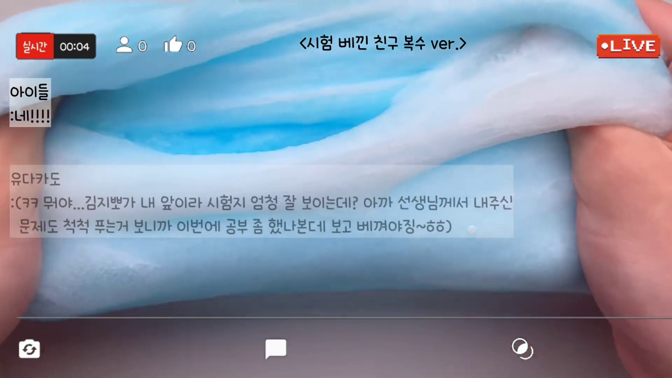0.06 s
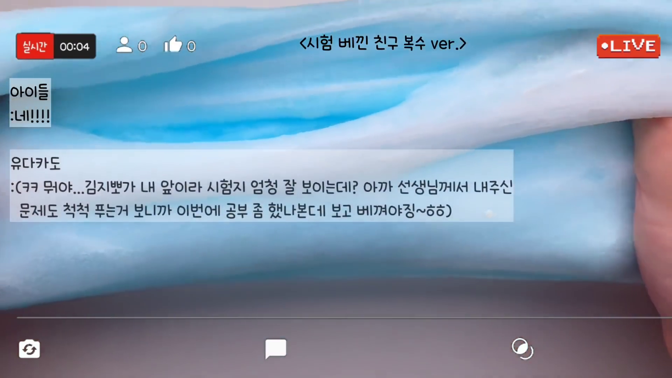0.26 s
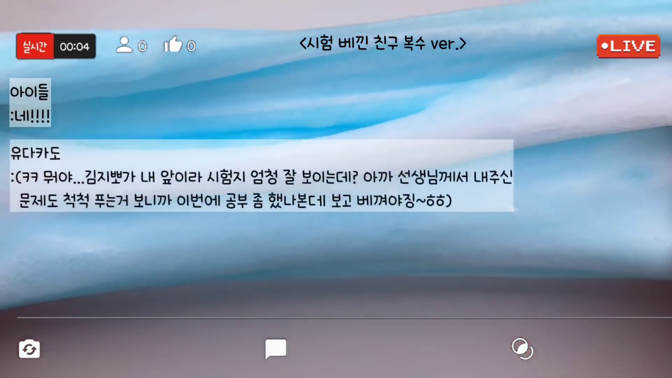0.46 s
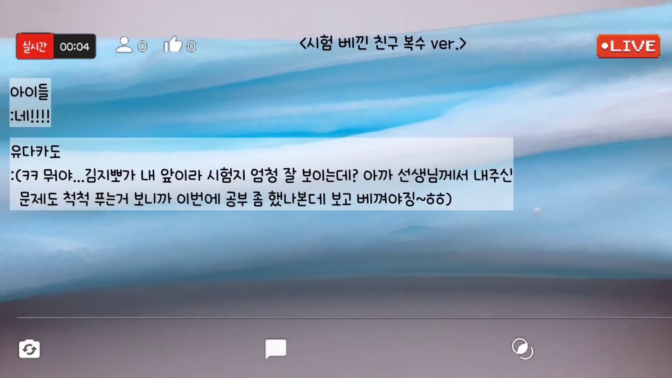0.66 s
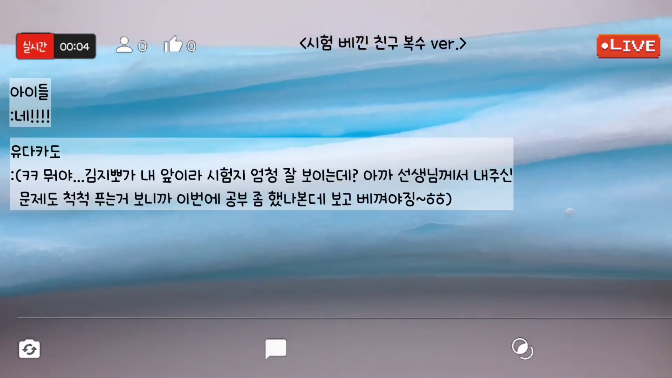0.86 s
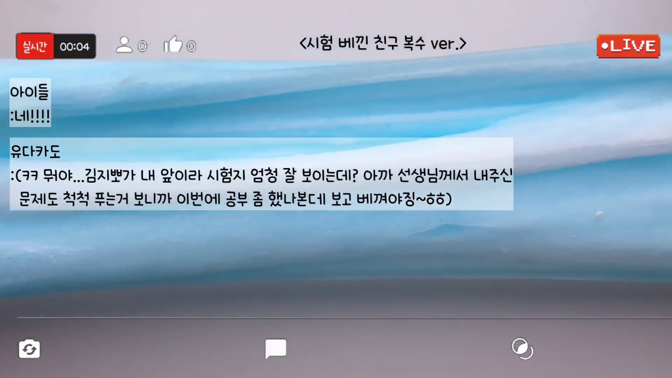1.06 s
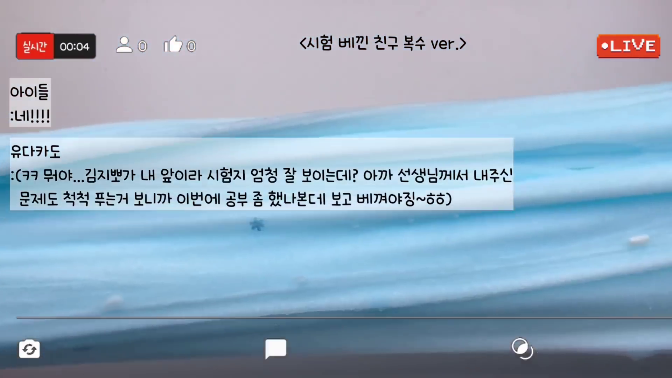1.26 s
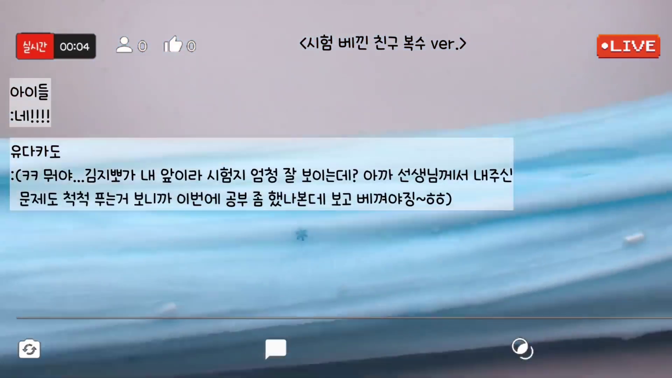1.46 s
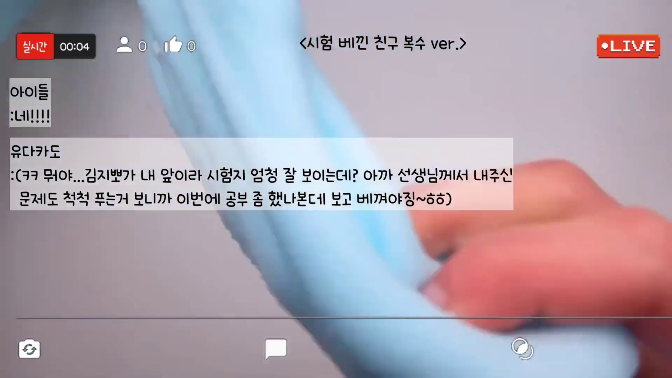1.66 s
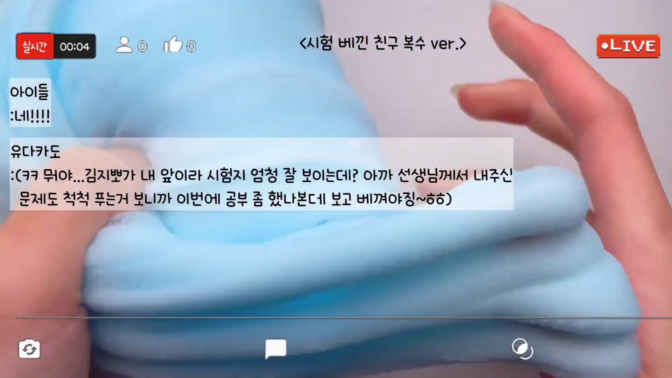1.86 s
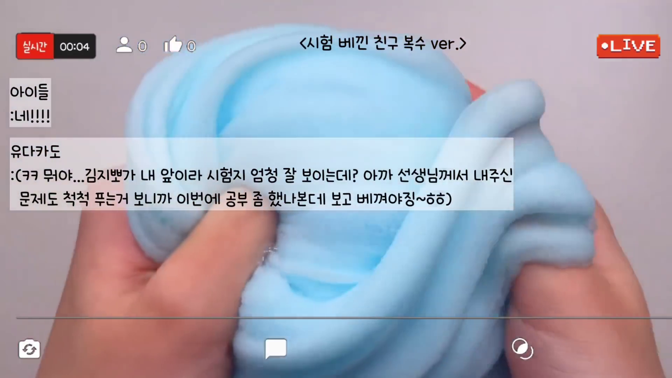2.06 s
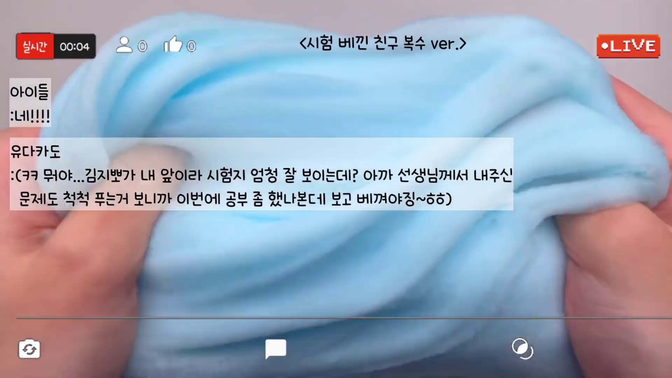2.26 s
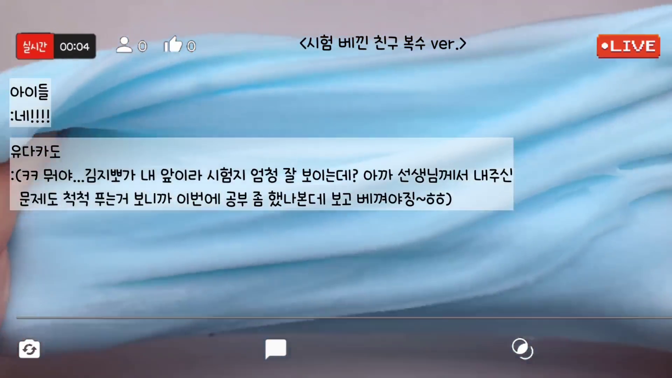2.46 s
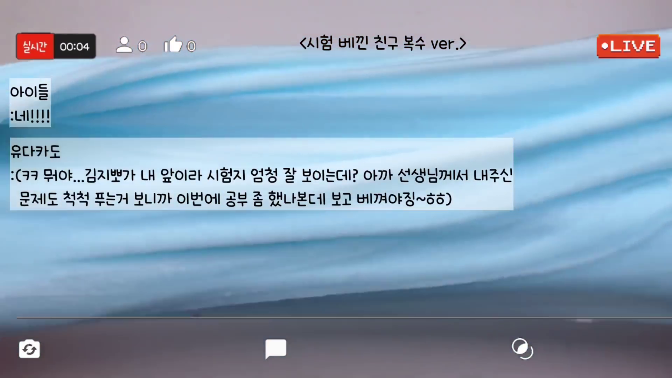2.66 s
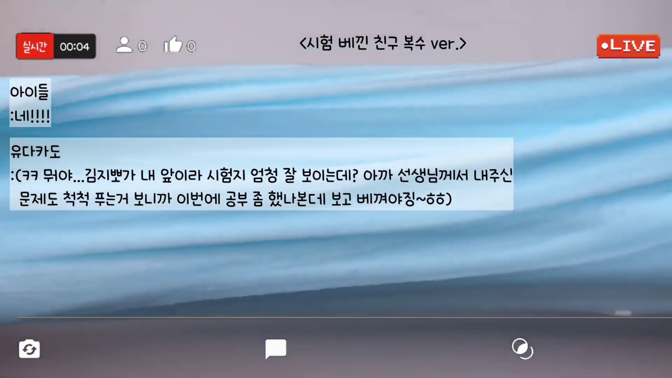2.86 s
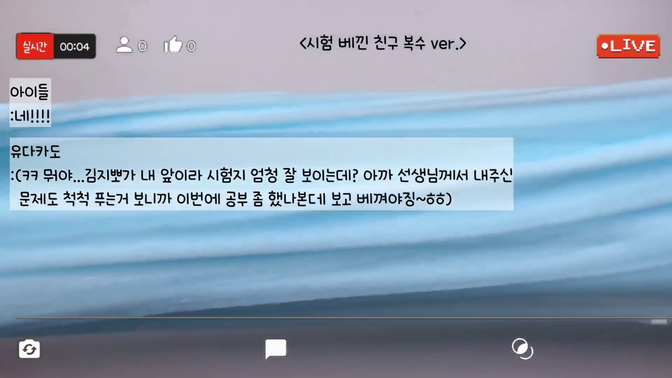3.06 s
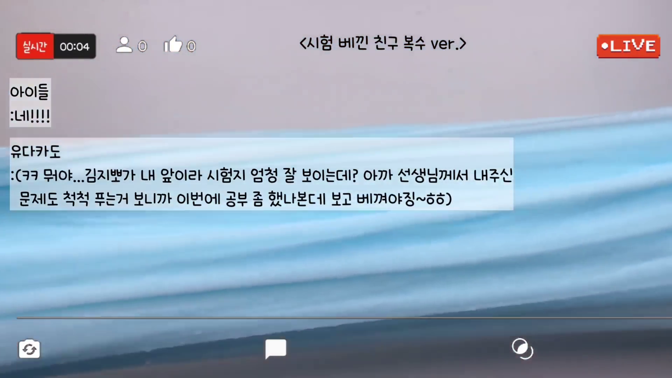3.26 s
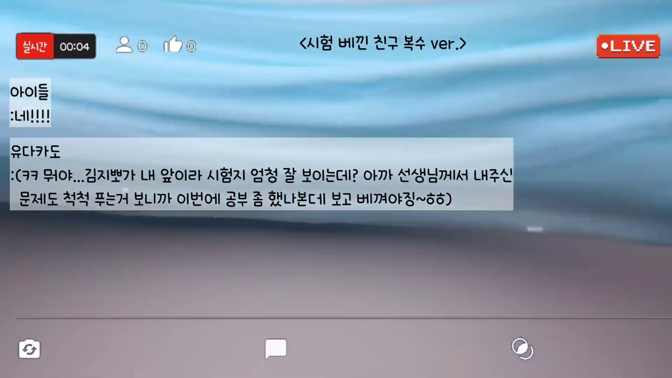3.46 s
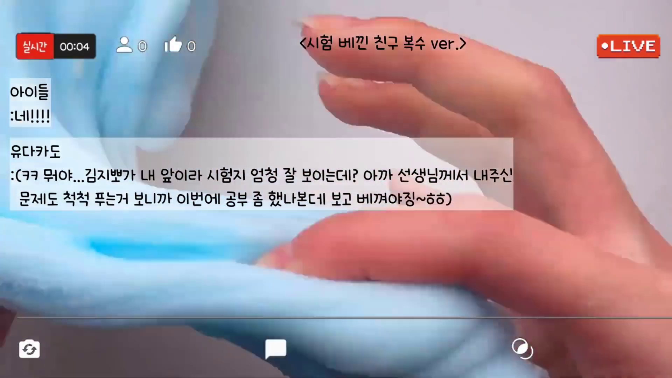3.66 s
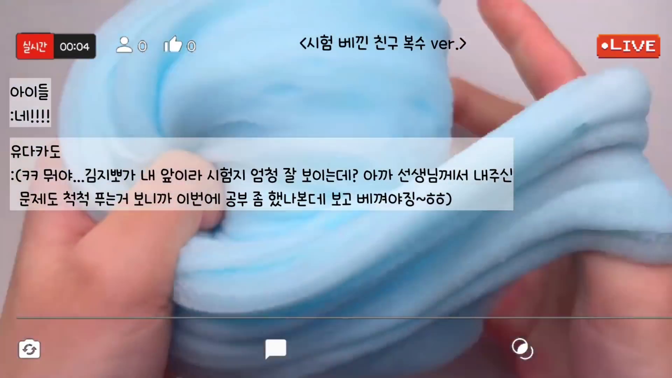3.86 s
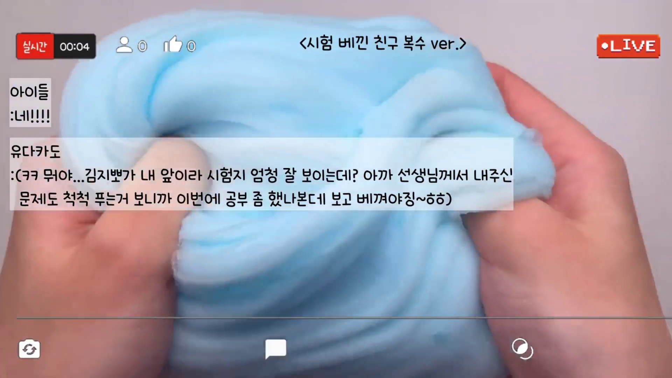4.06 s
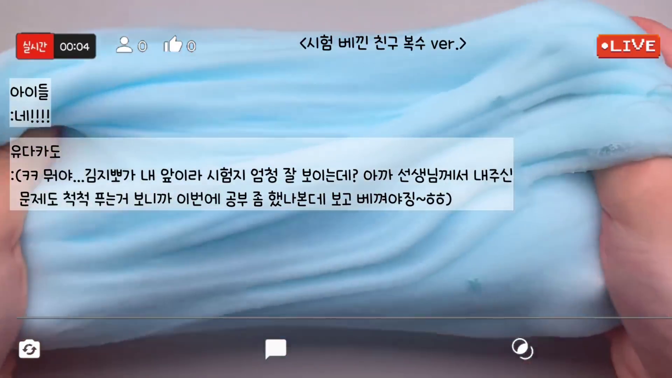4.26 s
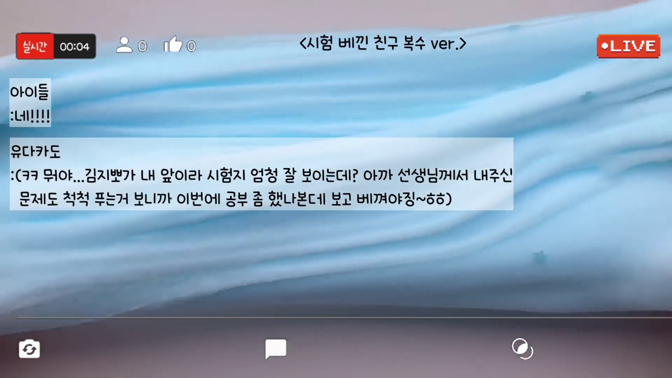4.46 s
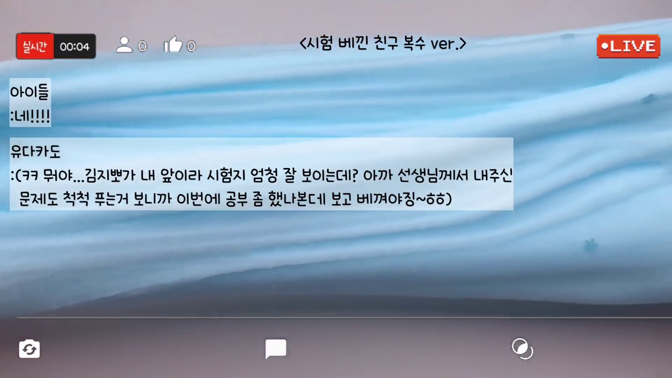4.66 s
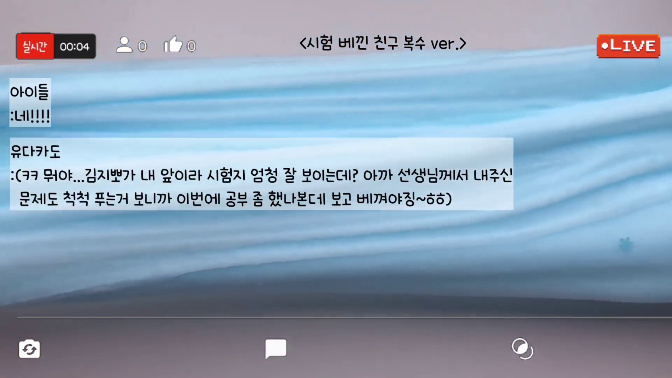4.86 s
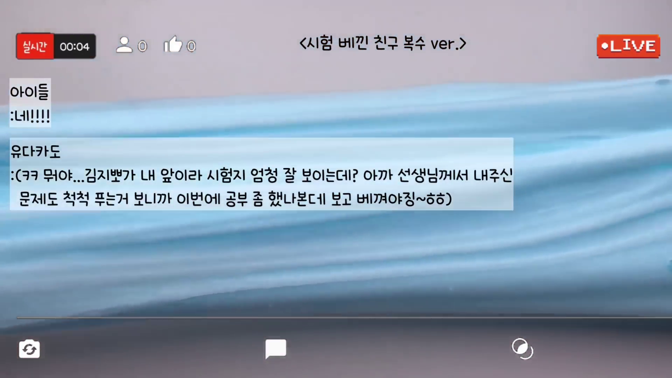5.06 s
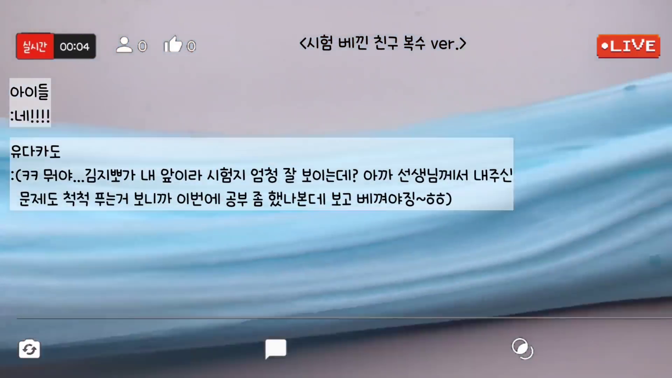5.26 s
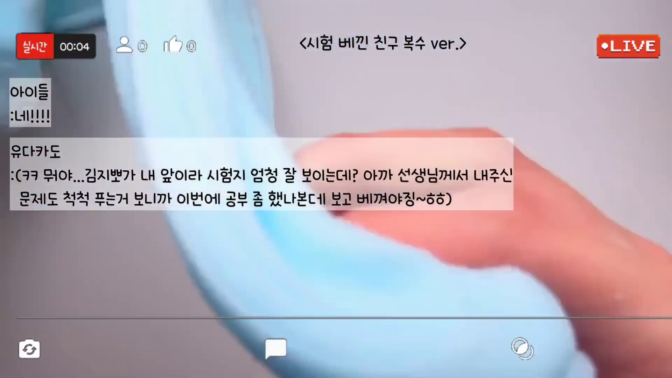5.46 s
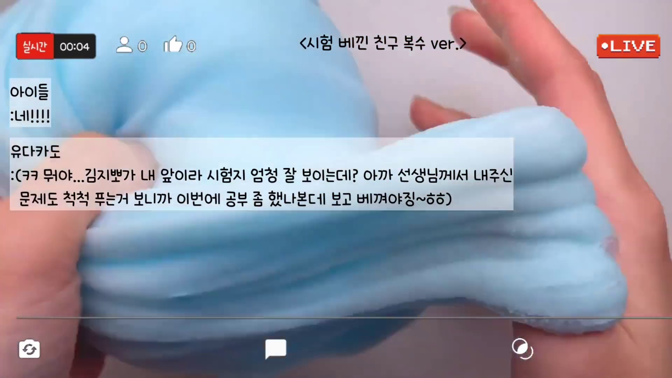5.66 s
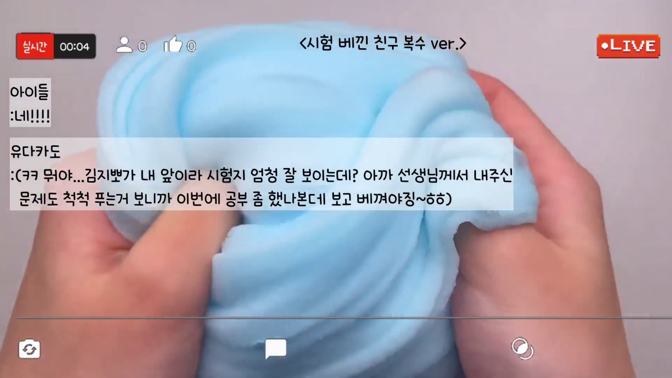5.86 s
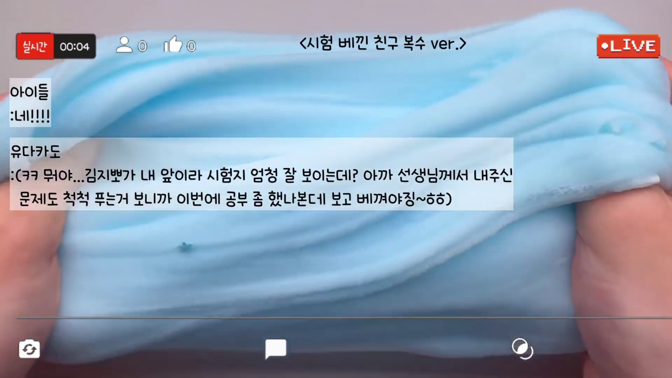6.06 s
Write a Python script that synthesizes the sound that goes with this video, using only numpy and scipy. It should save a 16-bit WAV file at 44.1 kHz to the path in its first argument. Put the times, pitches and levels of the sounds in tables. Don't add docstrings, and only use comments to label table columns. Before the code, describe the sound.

Close stereo sound of sticky slime being pulled and folded in a small quiet room. Faint fizz and tiny ticks come first, then short squelches and crackling clusters of pops around two seconds. Quieter stretching follows, before more kneading, snapping clicks and hollow pops near four seconds and again at the end. A low motor hum enters after about one second, mainly left.

```python
import sys
import numpy as np
from scipy import signal
from scipy.fft import rfft, irfft
from scipy.io import wavfile
from scipy.ndimage import uniform_filter1d

SR = 44100
rng = np.random.default_rng(int(sys.argv[2]) if len(sys.argv) > 2 else 0)


def invert_db(x):
    u = np.asarray(x, float) / 20
    return 10 ** u


def file_out(sig):
    cols = np.atleast_2d(sig).T
    lim = np.clip(cols, -1, 1)
    pcm = np.round(lim * 32767).astype(np.int16)
    wavfile.write(sys.argv[1], SR, pcm)


N = 269451


def evened(x):
    return x / np.sqrt(np.mean(x ** 2) + 1e-20)


def peaked(x):
    return x / abs(x).max()


def read(points, hz):
    f, value = np.transpose(points)
    return np.interp(np.log(hz + 1), np.log(f + 1), value)


def add(mix, start_s, sound):
    part = mix[:, round(start_s * SR):][:, :sound.shape[1]]
    part += sound[:, :part.shape[1]]


def ring(x, hz, width_hz):
    quality = max(hz / width_hz, .3)
    return signal.lfilter(*signal.iirpeak(min(hz, 18000), quality, SR), x)


def band(x, lo_hz, hi_hz):
    return signal.lfilter(*signal.butter(2, [lo_hz, min(hi_hz, 20000)], "band", fs=SR), x)


def wander(per_s):
    knots = rng.standard_normal(int(per_s * N / SR) + 2)
    joined = np.interp(np.arange(N) * per_s / SR, np.arange(len(knots)), knots)
    return joined * np.sqrt(1.5)


def grains(spectrum, per_s, spread_db, patchy_db):
    # pitch_hz, likeness (0 to 1)
    coherence = [(60, 0.84), (180, 0.63), (550, 0.03), (1650, 0.12), (4970, 0.027), (15000, 0.49)]
    happens = rng.random((2, N)) < per_s / SR
    size = invert_db(spread_db * np.minimum(rng.exponential(1, (2, N)), 5)) * happens
    hz, t, (a, b) = signal.stft(size * rng.standard_normal((2, N)), SR, nperseg=1024, noverlap=768)

    patches = rng.standard_normal(a.shape[::-1]).T
    patches = evened(uniform_filter1d(uniform_filter1d(patches, 14, 0), 6, 1))
    same = np.clip(read(coherence, hz), -1, 1)[:, None]
    ports = np.array([a, same * a + np.sqrt(1 - same ** 2) * b])
    ports *= invert_db(read(spectrum, hz)[:, None] + patchy_db * patches)
    both = signal.istft(ports, SR, nperseg=1024, noverlap=768)[1][:, :N]
    return both / np.sqrt(np.mean(both.mean(0) ** 2))


def gripping():
    # start_s, hold_s, peeling_db, kneading_db
    grips = [(0.001, 0.061, -56, -56.5), (1.088, 0.037, -54, -68), (1.24, 0.071, -60, -62.5),
             (1.52, 0.13, -45, -53), (1.7, 0.14, -50, -52.5), (1.805, 0.043, -73, -68),
             (2.18, 0.1, -53, -51.5), (2.54, .06, -73, -63.5), (3.437, .12, -43.5, -51.5),
             (3.601, 0.081, -47, -48.5), (3.752, 0.0088, -45.5, -45), (4.075, 0.12, -51, -51),
             (4.279, 0.061, -53.5, -55.5), (4.44, 0.052, -56, -69), (5.11, 0.022, -79, -59),
             (5.279, .13, -41.5, -49), (5.461, 0.083, -47, -44), (5.592, 0.018, -53, -47),
             (5.914, 0.16, -44, -47.5)]
    # time_s, peeling_db
    stretch = [
        (0, -62),
        (0.7, -58),
        (1.2, -65.5),
        (2.0, -62.5),
        (2.8, -62.5),
        (3.2, -64),
        (4.8, -62),
        (6.11, -58),
    ]
    rise_db_per_s, sag_db_per_s, let_go_db_per_s = 336, 36, 239
    creep_db, creep_db_per_s = -11, 23
    lean_db, lean_db_per_s = -7.5, 47
    rest_squelch_db, rest_push_db = -70.5, -66

    t = np.arange(0, N / SR, .002)
    start, hold, peel_db, knead_db = np.transpose(grips)[:, :, None]
    early = np.maximum(start - t, 0)
    held = np.clip(t - start, 0, hold)
    late = np.maximum(t - start - hold, 0)
    release_db = np.maximum(-let_go_db_per_s * late, creep_db - creep_db_per_s * late)
    grip_db = release_db - rise_db_per_s * early

    squelch_db = knead_db + grip_db
    fizz_db = peel_db + grip_db - sag_db_per_s * held
    push_db = knead_db + grip_db + lean_db - lean_db_per_s * (hold - held)
    layers = [(squelch_db, rest_squelch_db),
              (fizz_db, np.interp(t, *np.transpose(stretch))),
              (push_db, rest_push_db)]
    gains = []
    for each_db, rest_db in layers:
        energy = (invert_db(each_db) ** 2).sum(0) + invert_db(rest_db) ** 2
        gains.append(np.interp(np.arange(N) / SR, t, np.sqrt(energy)))
    return gains


def bubbles(per_s):
    bubble_hz = [688, 902, 1042, 1550, 2900]
    happens = rng.random((5, N)) < per_s / SR
    size = invert_db(4.0 * np.minimum(rng.exponential(1, (5, N)), 4)) * happens
    blips = 0
    for train, hz in zip(size, bubble_hz):
        width_hz = 0.26 * hz
        blips = blips + ring(ring(train, hz, width_hz), hz, width_hz) / np.sqrt(hz)
    return evened(blips) * np.ones((2, 1))


def hands():
    # pitch_hz, density_db (per Hz)
    squelch_colour = [(180, -3), (300, -27), (437, -8), (676, -3.5), (951, -0.5), (1200, -5), (1500, 2),
                      (1670, -3.5), (2620, -8.5), (5000, -10.5), (6500, -16), (11000, -120)]
    # pitch_hz, density_db (per Hz)
    fizz_colour = [(1470, -12), (2500, -1.5), (4300, -2.5), (5200, -3), (7070, -2.5), (8010, -3.5),
                   (10500, -0.5), (14800, -2), (15900, -13), (16400, -88)]
    # pitch_hz, density_db (per Hz)
    push_colour = [(18, -27), (30, -3.5), (58, 7.5), (97, -2), (146, -18), (182, -2), (253, -11),
                   (455, -20.5), (600, -20.5), (780, -45), (1320, -120)]
    # pitch_hz, density_db (per Hz)
    air_colour = [(180, -31), (300, 5), (530, 2.5), (1050, -21), (1830, 16), (2830, -35), (7980, 0),
                  (11200, 9), (14600, 6.5), (15600, 7.5), (16400, -64)]

    kneading, peeling, leaning = gripping()
    clumps_db = 2.0 * np.tanh(wander(per_s=42))
    kneading = kneading * invert_db(clumps_db)
    peeling = peeling * invert_db(0.71 * clumps_db)

    squelch = grains(squelch_colour, 7000, spread_db=2.6, patchy_db=3.6)
    fizz = grains(fizz_colour, 10000, spread_db=2.6, patchy_db=1.9)
    push = grains(push_colour, 8000, spread_db=1.5, patchy_db=2.0)
    air = invert_db(-66) * grains(air_colour, 40000, spread_db=-1.0, patchy_db=3.0)

    left = invert_db([[1.3], [-1.3]])
    moving = left * (kneading * invert_db(-2.44) * squelch + leaning * invert_db(6.5) * push) + peeling * fizz
    return moving + air + left * kneading * invert_db(-4.5) * bubbles(per_s=70)


def pockets():
    # start_s, hollow_db, pocket_db, pitch_hz, pan_db (left over right)
    bursts = [(0.992, -44.5, -34, 3400, 6), (1.066, -41, -11, 3930, 1.5), (1.271, -57, -12.5, 2830, -5.5),
              (1.7955, -14.5, -24.5, 1550, 6), (1.816, -38, -40, 2370, -4), (2.1715, -7, -9.5, 2800, 7),
              (2.177, -35, -38, 2280, 6), (2.239, -32, -15, 2540, 1.4), (3.741, -51, -35, 2200, 4),
              (4.082, -13, -16, 3160, 6), (4.0814, -18, -19.5, 4870, -1.5), (4.185, -35, -35, 3340, 2.2),
              (4.196, -50, -27, 2250, 2.5), (4.202, -39, -10, 6500, 1.2), (4.723, -30, -30, 1700, 1.5),
              (5.274, -33, -41, 2560, 3), (5.455, -35, -52, 1900, 8), (5.574, -29, -48, 1830, 5),
              (5.6, -34, -32.5, 2700, 13), (5.862, -23, -17, 3760, 5.5), (5.915, -25, -49, 2390, 3.8),
              (5.934, -30, -57, 1550, 7), (5.953, -31, -20.5, 4200, 1), (5.996, -21.5, -30, 3450, 4)]
    # start_s, level_db, pitch_hz, pan_db (left over right)
    blips = [(0.22, -46, 1860, 2), (0.319, -47, 3020, 9), (0.564, -41, 1900, 9), (0.761, -32, 2450, 10.5),
             (1.004, -39, 2680, 3), (1.014, -40.5, 1690, 0.5), (1.153, -50, 2040, 4),
             (1.221, -36, 2550, 2.5), (1.226, -35, 2000, 5), (1.246, -32.5, 4830, 14),
             (1.615, -42, 2380, 1), (2.094, -44.5, 2800, 13), (2.421, -47, 1720, 3.5),
             (2.605, -40.5, 1660, 3.5), (2.765, -51, 3060, 3), (2.857, -38.5, 2900, 6),
             (2.972, -53, 1530, 2.2), (3.649, -25, 4470, -5), (3.673, -34.5, 2220, -3),
             (3.759, -26.5, 2880, 4), (4.994, -45, 1850, 4), (5.522, -32, 2110, 9)]
    # start_s, level_db, pan_db (left over right)
    gulps = [(0.037, -38, 3), (0.114, -42.5, 8), (1.717, -38, 0), (1.793, -25, -2), (2.067, -48, 14),
             (2.095, -51, 10), (2.187, -27, -3), (2.215, -49, 5.3), (2.517, -50, 2), (3.978, -36.5, 7),
             (4.101, -40, 6), (4.153, -35, 3.5), (4.269, -37.5, 5.5), (4.308, -32, 4.5),
             (4.363, -41.5, 3.5), (4.537, -46, 3), (4.557, -45.5, 2.5), (5.124, -48.5, 17), (5.663, -39, 9),
             (5.893, -48, 2.3), (5.981, -21, 4), (6.033, -33, 4), (6.058, -32.5, 2.2), (6.067, -46, 6)]
    # start_s, level_db, pan_db (left over right)
    snaps = [(0.071, -39, -8), (0.992, -35, 2), (1.814, -28, 8), (1.817, -26, -7), (1.894, -34, 7),
             (2.239, -15.5, -5), (3.764, -26, 10), (4.082, -18.5, 1), (4.184, -18, 3.5), (4.202, -13, 5),
             (4.433, -12, 5), (5.274, -40, 2.2), (5.455, -37, 9), (5.793, -40, 17), (5.836, -32, -3),
             (5.916, -27, 2), (5.953, -20, 5)]

    rows = []
    for s, hollow_db, pocket_db, hz, pan_db in bursts:
        snap_db = pocket_db - 13.5 + 11 * np.log2(hz / 3000)
        rows.append((s, hollow_db, pocket_db, hz, snap_db, pan_db))
    for s, pocket_db, hz, pan_db in blips:
        rows.append((s, pocket_db - 32, pocket_db, hz, pocket_db - 6, pan_db))
    for s, hollow_db, pan_db in gulps:
        rows.append((s, hollow_db, hollow_db - 36.5, 1900, hollow_db - 24, pan_db))
    for s, snap_db, pan_db in snaps:
        rows.append((s, snap_db - 23.5, snap_db - 33.5, 3100, snap_db, pan_db))
    return rows


def tearing(chance, rise_s, fall_s):
    t = np.arange(chance.shape[-1]) / SR - .004
    tear = np.exp(-np.abs(t) / np.where(t < 0, rise_s, fall_s))
    return tear * chance - 8 * (tear == tear.max())


def pop(row, chance):
    # pitch_hz, width_hz, level_db
    gap_modes = [(931, 108, 15.5), (1160, 980, 4), (560, 1350, -8.5)]
    s, hollow_db, pocket_db, hz, snap_db, pan_db = row
    side = np.array([[1], [-1]]) / 2
    ticks = tearing(0.45 * chance[0] ** 3, 0.0008, .002)
    sparks = chance[1] + 2.15 * side * chance[3]
    fine = tearing(1.5 * sparks * (0.17 + chance[2] ** 2), .001, 0.0015)

    shape = 1 + 0.04 * np.tanh(chance[0, 0]) - .03
    gaping = 1 + np.clip((hollow_db + 30) / 25, 0, 1)
    hollow = sum(invert_db(db) * ring(ticks, f * shape, width * gaping) for f, width, db in gap_modes)

    loudness = np.clip((pocket_db + 37.0) / 26, 0, 1)
    shallowness = np.clip((pocket_db - hollow_db + 4) / 11, .1, 1)
    torn = loudness * shallowness
    width_hz = hz * (0.4 + 1.97 * torn ** 2)
    pocket = ring(ring(ticks + torn * fine, hz, width_hz), hz, width_hz)

    sound = invert_db(hollow_db) * peaked(band(hollow, 350, 2340)) - invert_db(pocket_db) * peaked(pocket)
    sound += invert_db(snap_db) * peaked(band(fine, 8200, 15540))
    f = np.fft.rfftfreq(len(ticks), 1 / SR)
    lead_s = .00005 * np.clip(pan_db, -5, 5) / (1 + (f / 2500) ** 2)
    placed = irfft(rfft(sound) * np.exp(2j * np.pi * f * lead_s * side))
    return s - .0039, invert_db(0.25 + pan_db * side) * placed


def room(x):
    # pitch_hz, t60_s
    decay = [(200, 0.21), (900, 0.21), (3000, 0.051), (12000, 0.011)]
    # pitch_hz, level_db
    answer = [(200, -10), (900, -10), (3000, -11.5), (12000, -3)]
    taps = np.zeros((2, SR // 2))
    at = np.arange(120, SR // 2 - 20, 20) + rng.integers(0, 20, (2, (SR // 2 - 121) // 20))
    np.put_along_axis(taps, at, rng.choice([-1., 1.], at.shape), 1)
    hz, t, z = signal.stft(taps + 0.93 * taps[::-1], SR, nperseg=256)
    t60 = read(decay, hz)[:, None]
    z *= invert_db(read(answer, hz)[:, None] - 60 * t / t60) / np.sqrt(250 * t60)
    reflections = signal.istft(z, SR, nperseg=256)[1]
    return signal.fftconvolve(x, reflections, axes=1)[:, :N]


def compressor():
    # time_s, level_db
    hum = [(1.24, -44), (1.27, -47), (1.51, -50), (2.03, -44), (2.24, -57), (2.28, -47.5), (2.35, -52.5),
           (2.99, -50), (3.75, -43.5), (3.78, -40.5), (4.03, -46.5), (4.13, -42), (4.32, -50.5),
           (5.21, -43.5), (5.25, -46), (5.5, -42), (6.07, -41.5), (6.11, -46)]
    s, hum_db = np.transpose(hum)
    t = np.arange(N) / SR
    phase = 2 * np.pi * 58.45 * t
    started = np.clip((t - 1.215) / 0.03, 0, 1)
    wavering_db = np.interp(t, s, hum_db) + 1.2 * wander(per_s=14)
    strength = np.sqrt(2) * invert_db(wavering_db) * started
    return strength * np.array([invert_db(5.0) * np.sin(phase), invert_db(-9.5) * np.sin(phase + 0.65)])


def slap(row, chance):
    s, db, hz = row
    drop, drop_s = 2.43, 0.0017
    rise_s, fall_s = 0.0012, 0.0039
    t = np.arange(len(chance)) / SR
    jitter = 1 + 1.97 * uniform_filter1d(chance, size=60)
    turns = np.cumsum(hz * (0.72 + drop * np.exp(-t / drop_s)) * jitter) / SR
    push = (1 - np.exp(-t / rise_s)) * np.exp(-t / fall_s) * np.sin(2 * np.pi * turns)
    ports = np.array([push, np.roll(push, shift=9)])
    return s - .001, invert_db(db + np.array([[.6], [-.6]])) * peaked(ports)


def scene():
    # start_s, level_db, pitch_hz
    slaps = [(1.27, -34.5, 362), (1.796, -25.5, 323), (2.172, -16.5, 376), (2.178, -29, 340),
             (2.187, -26.5, 402), (2.239, -28.5, 320), (4.085, -26.5, 300), (4.185, -39.5, 448),
             (5.124, -46.5, 380), (5.274, -36.5, 305), (5.458, -46, 370.0), (5.524, -46, 247),
             (5.861, -27, 336), (5.955, -35, 443), (5.98, -38, 398), (1.798, -30.5, 177), (5.917, -34, 322),
             (6.068, -35, 327)]
    bursts, rows = np.zeros((2, N)), pockets()
    for row, chance in zip(rows, rng.standard_normal((len(rows), 4, 2048))):
        add(bursts, *pop(row, chance))
    for row, chance in zip(slaps, rng.standard_normal((len(slaps), 2048))):
        add(bursts, *slap(row, chance))
    return bursts + room(bursts) + hands() + compressor()


def low_pass(x):
    return signal.sosfilt(signal.butter(12, 16640, fs=SR, output="sos"), x)


def record(dry):
    x = signal.sosfilt(signal.butter(4, 37, "high", fs=SR, output="sos"), dry)
    limit = .5
    x = limit * np.tanh(x / limit)
    lowpass = signal.firwin(511, 16350, window=("kaiser", 9), fs=SR)
    x = signal.oaconvolve(x, lowpass[None], "same")
    return low_pass(x)


dry = scene()
out = record(dry)
file_out(out)
```